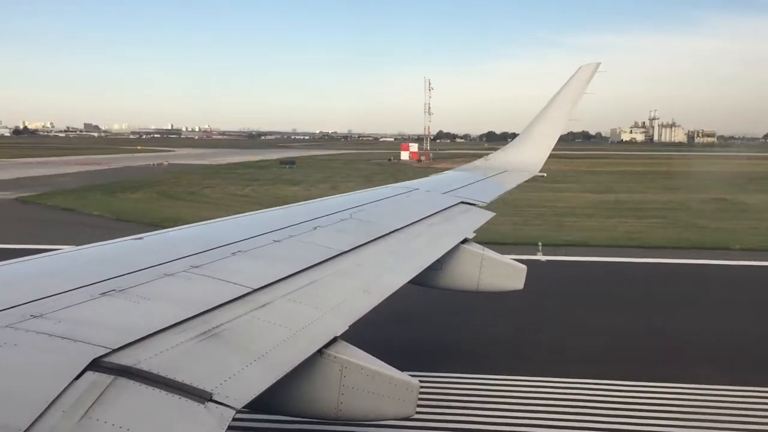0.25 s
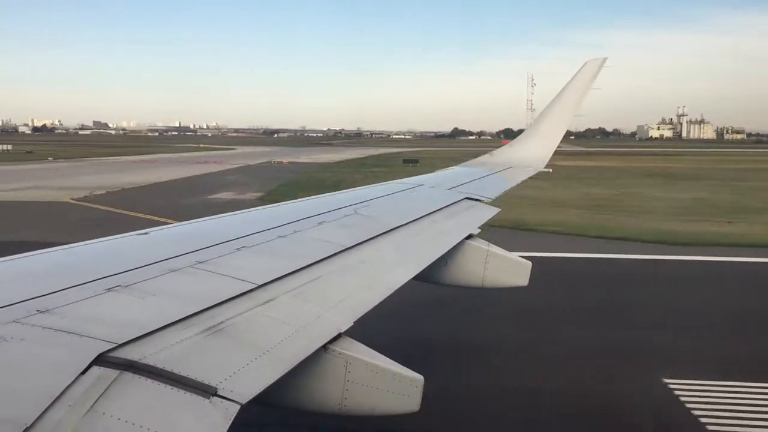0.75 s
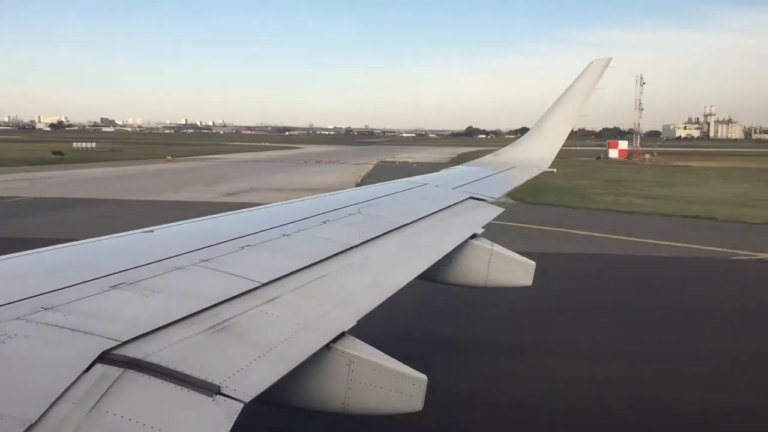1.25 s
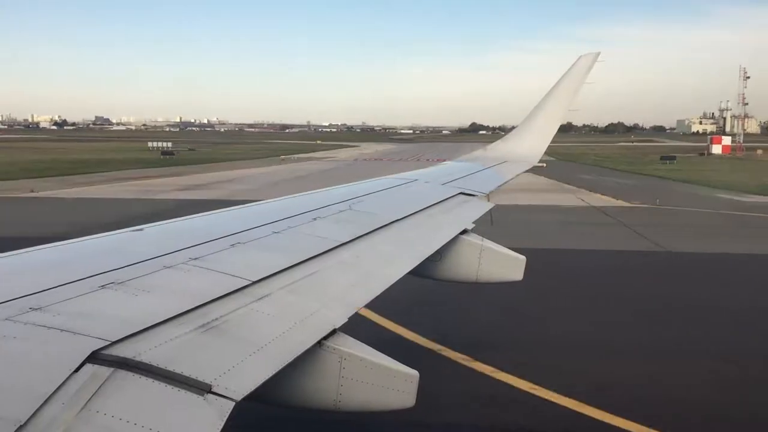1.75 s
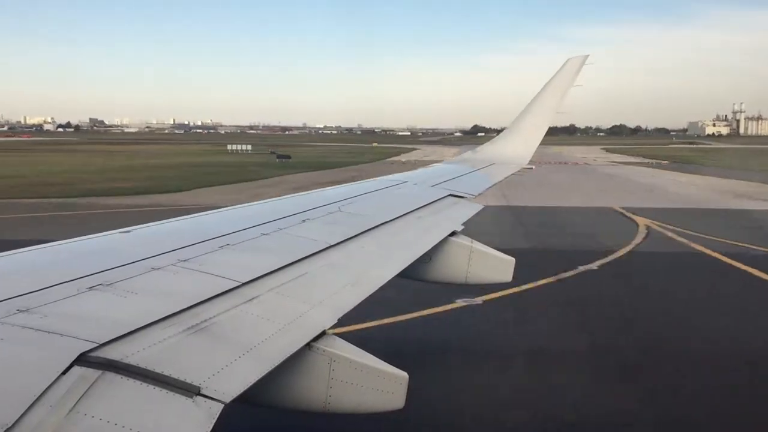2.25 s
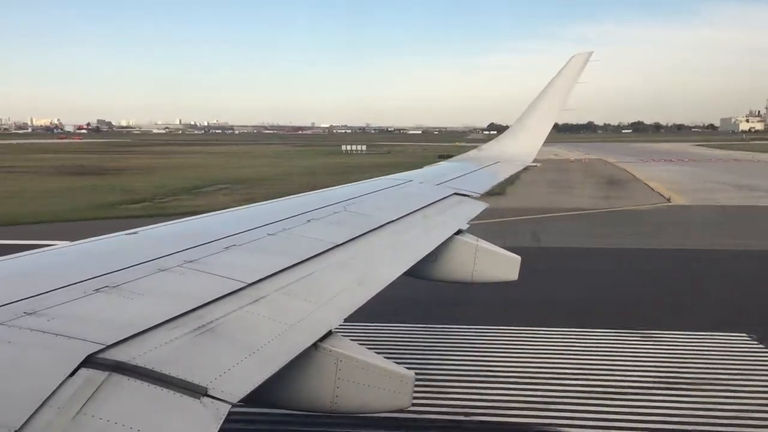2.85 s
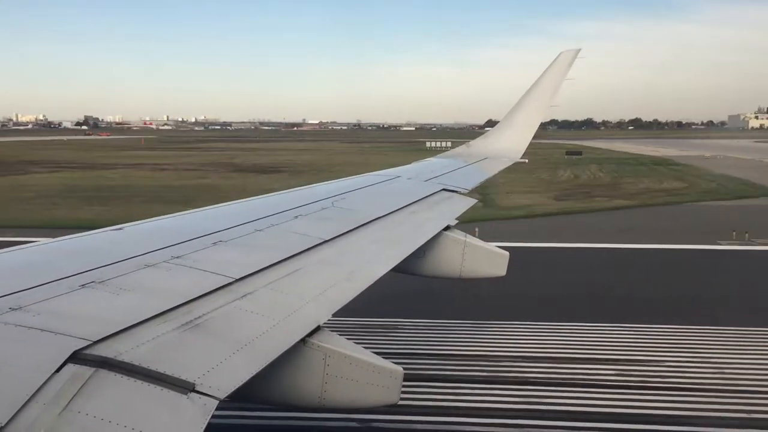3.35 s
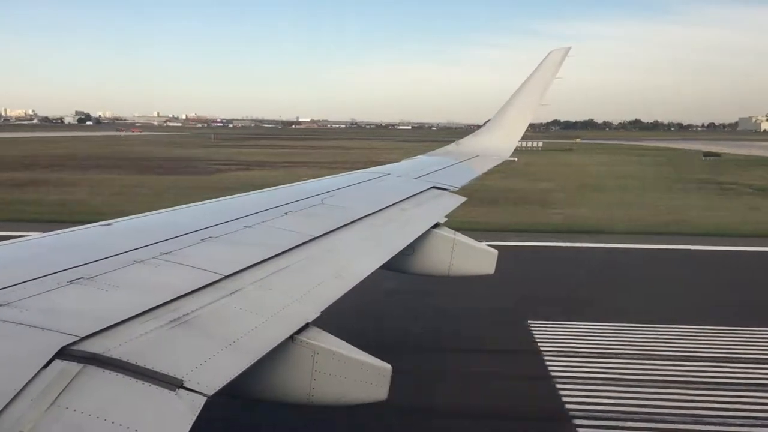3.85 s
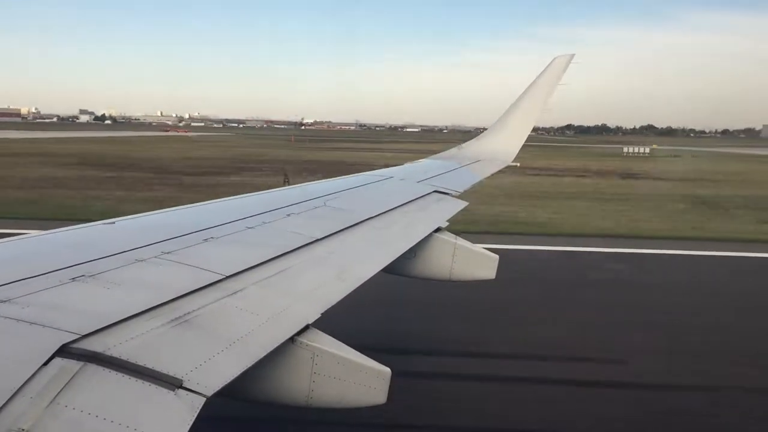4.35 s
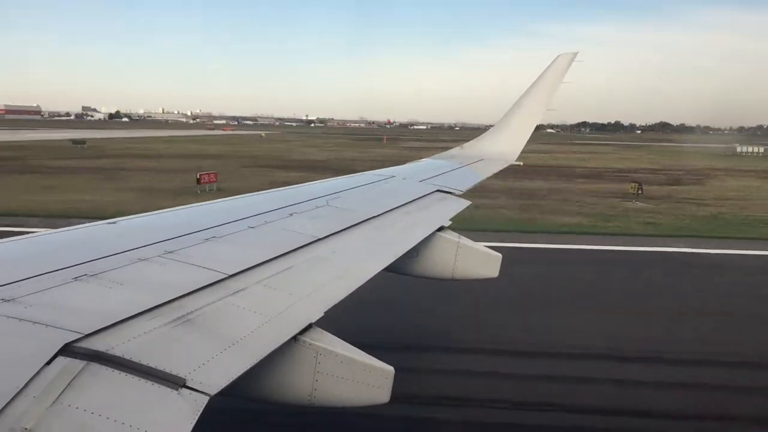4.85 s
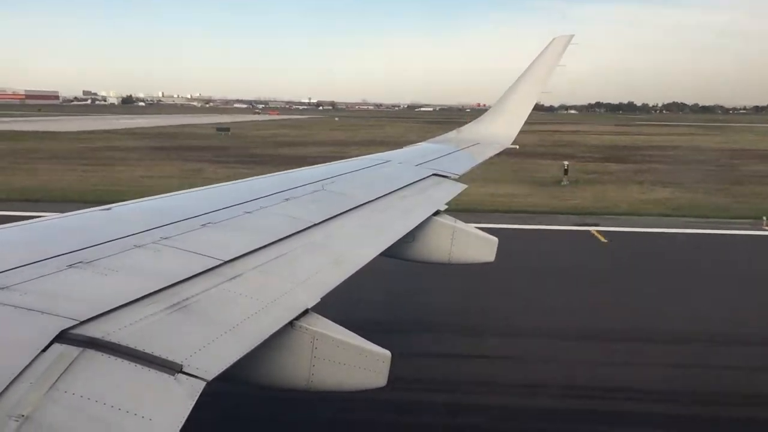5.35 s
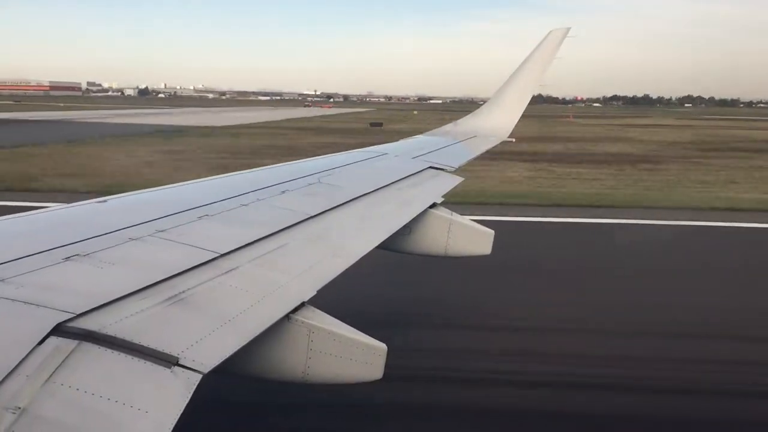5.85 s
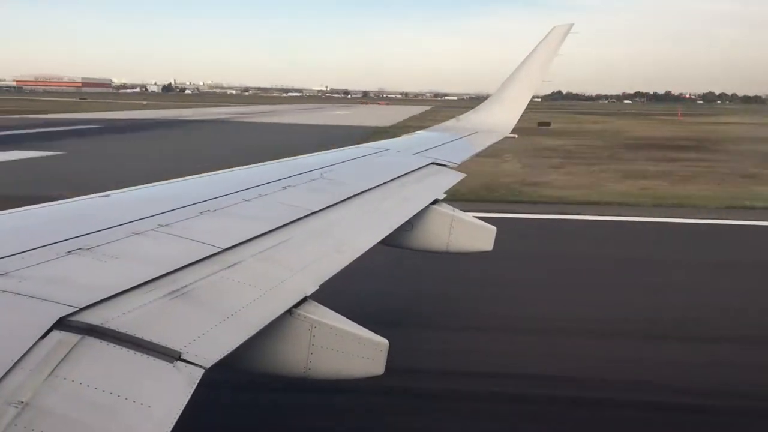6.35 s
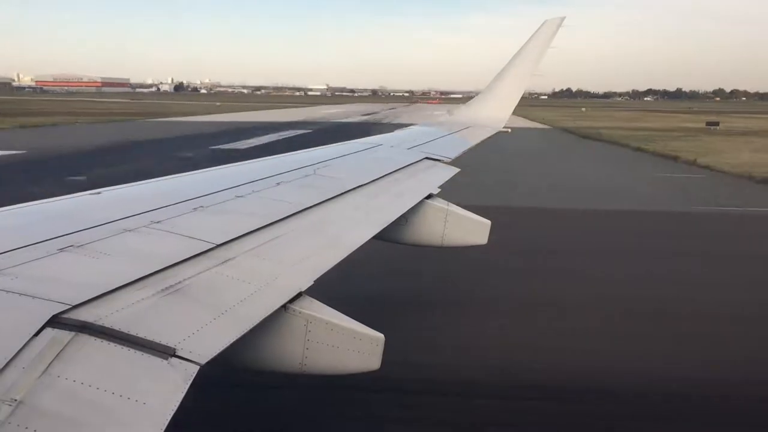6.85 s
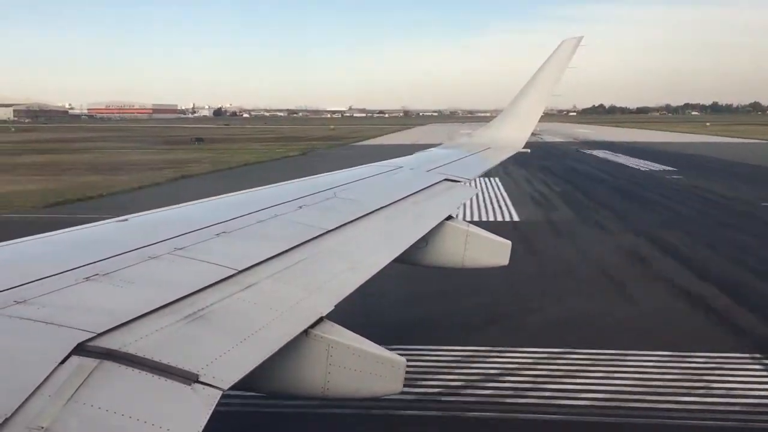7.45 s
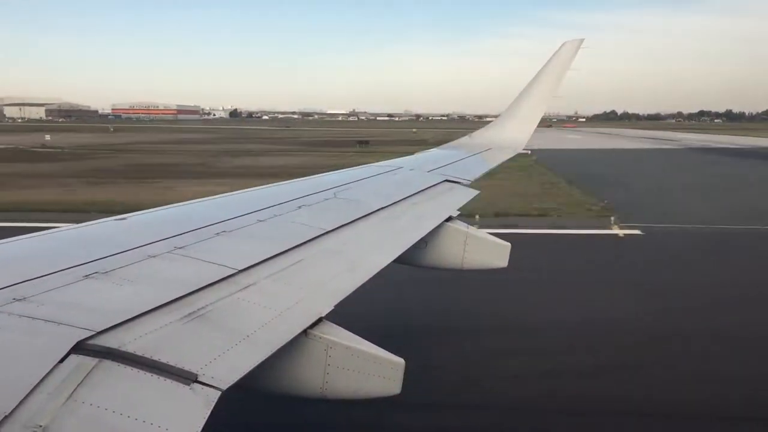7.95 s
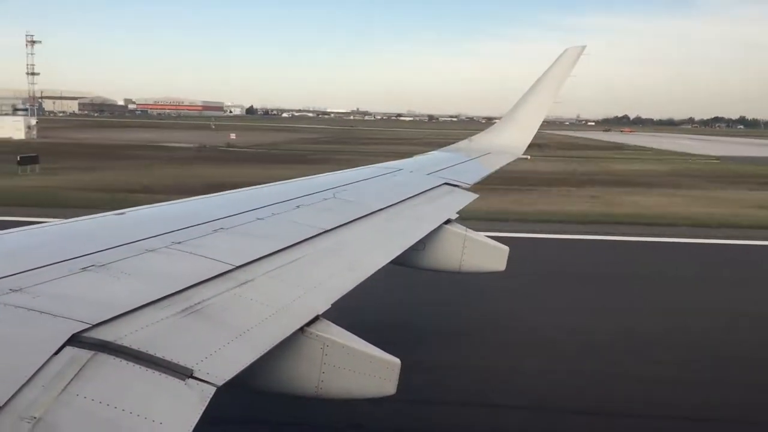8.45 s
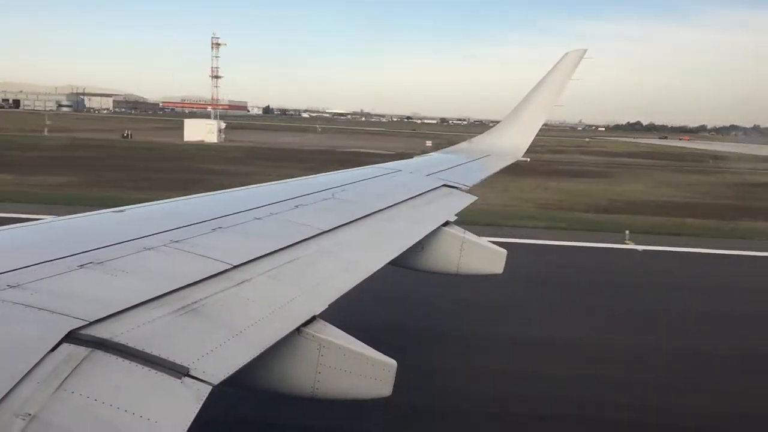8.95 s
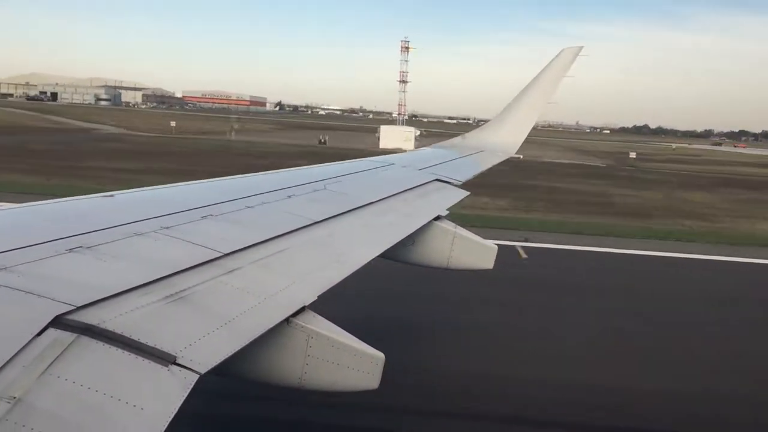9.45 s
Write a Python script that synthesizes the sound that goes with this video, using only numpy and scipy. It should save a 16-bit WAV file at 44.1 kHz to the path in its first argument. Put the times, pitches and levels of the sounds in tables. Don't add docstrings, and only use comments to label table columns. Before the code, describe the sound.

From 0 to about 9.7 seconds, the inside of an airliner cabin on its takeoff roll is filled by a continuous, heavy jet roar: deep rumble through the frame, with a duller, quieter roar from the wall panels. Its level stays nearly steady, slightly fuller around 3.4-4.2 s and slightly lower near 5 and 8 s. A very low boom swells in short irregular pulses throughout, strongest from 8.5 to 9.5 s. Far quieter, an overhead vent hisses with a fluttering, breathy, very high whistle. Faint steady hum and thin machine tones hide behind the noise. Loose trim makes brief dry buzzes and taps, frequent in the first 3.7 s, sharper near 3.4 s, sparser from 4 to 6 s, then busy again around 8.4-9 s. One sharp panel crack snaps at 6.9 s. The roar continues to the end, close and enclosed.

```python
import sys
import numpy as np
from scipy import signal
from scipy.fft import rfft, irfft, next_fast_len
from scipy.io import wavfile

SR = 44100
rng = np.random.default_rng(int(sys.argv[2]) if len(sys.argv) > 2 else 0)


def waveform_to_disk(signal):
    frames = np.transpose(np.atleast_2d(signal))
    scaled = np.clip(frames, -1, 1) * 32767
    samples = np.round(scaled).astype(np.int16)
    wavfile.write(sys.argv[1], SR, samples)


def gain_from_db(level_db):
    decades = np.asarray(level_db, float) / 20
    return 10 ** decades


N = 427769

# t/s, level/dB above the mean
THRUST = [(0, .5), (1, 0.4), (2, 0), (2.6, 0), (3.4, 0.9), (4.2, 0.7), (5, -0.6), (6, 0.3), (7, 0.1),
          (8, -0.6), (9, -0.2), (9.7, 0)]
# f/Hz, level/dB per Hz
RUMBLE_COLOUR = [(15, -51), (25, -19), (41, -17.5), (54, 0), (108, -1.5), (166, -6), (198, -6.5),
                 (231, -12), (283, -18.5), (317, -27.5), (388, -25.5), (430, -13.5), (520, -29.5),
                 (680, -58), (1140, -120)]
# f/Hz, level/dB per Hz
WALL_COLOUR = [(140, -30), (240, 1), (277, -1.5), (328, -9.5), (415, -7.5), (526, -20), (726, -22),
               (1120, -30), (1220, -29), (1490, -35), (2300, -43), (2990, -72), (5060, -120)]
# f/Hz, width/Hz, lift/dB
FUSELAGE_MODES = [(106.8, 9.2, 3.5), (140.4, 8.7, 5), (197, 16, 3.5), (278.4, 9.7, 1.5), (383, 12, 1.5),
                  (439, 14, 0), (238, 8.4, -1.5)]
# f/Hz, width/Hz, lift/dB
PANEL_MODES = [(560, 30, 2.5), (640, 40, 2), (720, 40, 2), (790, 24, -3), (1044, 40, 4.5), (1215, 30, 5),
               (1624, 32, 5.5), (2088, 30, 4.5), (2133, 16, 6)]
# t/s, f/Hz, peak level/dB
BOOM_SWELLS = [(0.31, 58.85, -16.5), (1.04, 64.94, -19.5), (1.2, 65.92, -18), (1.71, 61.02, -22),
               (1.82, 64.0, -16.5), (1.96, 67.18, -18.5), (2.26, 67.8, -16), (2.4, 68.85, -16.5),
               (2.8, 62.93, -19), (3.51, 64.68, -19), (3.67, 64.0, -15.5), (3.84, 64.4, -19.5),
               (4.56, 63.55, -17.5), (5.13, 64.6, -14.5), (5.83, 60.03, -16.2), (6.06, 61.3, -22),
               (6.22, 64.1, -13.5), (6.69, 61.8, -12.5), (7.0, 61.82, -17.0), (7.25, 66.7, -20),
               (7.38, 64.0, -17.5), (7.62, 58.65, -14.5), (7.77, 65.15, -16.5), (7.89, 61.56, -13.5),
               (8.55, 63.37, -12.5), (8.88, 68.57, -11), (9.14, 62.6, -11.5), (9.36, 63.8, -13),
               (9.51, 65.7, -16.8), (9.61, 65.7, -22.5)]
# t/s, whistle f/Hz, whistle level/dB, flow level/dB above the mean
AIR_JET = [(0, 14760, -84, 1), (.45, 14560, -84, 0.9), (1.0, 14530, -85, 0.4), (1.55, 14650, -91.5, 1),
           (1.85, 14500, -79, -2), (2.9, 14480, -83, .6), (3.2, 14400, -82, -1.2), (4.2, 14360, -86, 0.6),
           (4.45, 14370, -90, -0.1), (5.15, 14470, -89, 2), (5.36, 14370, -80.5, -0.2),
           (6.5, 14550, -79, -.2), (7.15, 14500, -84.5, -2.2), (7.3, 14630, -80.5, -1),
           (8.3, 14500, -78.5, 0), (8.6, 14440, -91, 0.8), (8.85, 14440, -84, 0.6),
           (9.7, 14670, -83.5, -0.2)]
# f/Hz, level/dB per Hz
HISS_COLOUR = [(2200, -6.5), (2490, -1.5), (2960, -5.5), (3540, -1.5), (4040, -2), (4600, -7), (5600, -13),
               (6930, -14), (7590, -18.5), (9310, -18.5), (10500, -26), (13500, -26), (14600, -27),
               (15700, -30)]
# f/Hz, width/Hz, lift/dB
DUCT_MODES = [(2250, 20, 3), (2470, 40, 2.5), (2577, 36, 7), (2825, 45, 7.5), (3130, 50, 7),
              (3316, 30, 6.5), (3425, 40, 5.5), (3596, 44, 9), (3665, 40, 3.5), (3780, 30, -3),
              (3885, 50, 4.5), (3980, 50, 4.5), (4065, 20, 4.5), (4124, 50, 5), (4238, 25, 3.5),
              (4346, 22, 5.5), (4870, 40, 3)]
# f/Hz, width/Hz, lift/dB
NOZZLE_MODES = [(6950, 500, 1.5), (7550, 300, -2), (10450, 500, -2.5), (11500, 1200, 1.5),
                (13200, 1200, -2), (15500, 700, -2.5)]
# start t/s, end t/s, first f/Hz, last f/Hz, level/dB
WHISTLE_STRANDS = [
    (-.1, 1.303, 14250, 13970, -83.5),
    (8.65, 9.802, 14020, 14170, -84),
]
# strongest tap t/s, its level/dB, length/s
TRIM_BUZZES = [(0.337, -59.5, 0.033), (0.718, -59.5, 0.02), (0.911, -59.5, 0.031), (1.108, -56.5, 0.021),
               (1.26, -59, 0.031), (1.405, -61.5, 0.046), (1.931, -60.5, 0.022), (1.986, -60, 0.052),
               (2.157, -59, 0.031), (2.514, -56.5, 0.033), (2.726, -59.5, 0.037), (2.992, -59, 0.05),
               (3.105, -58.5, 0.029), (3.431, -53, 0.042), (3.638, -57, 0.052), (3.706, -60.5, 0.032),
               (4.27, -56.5, 0.023), (5.051, -58.5, 0.032), (5.108, -60, 0.022), (6.293, -61.5, 0.028),
               (6.72, -59.5, 0.026), (6.892, -59.5, 0.05), (7.386, -62.5, 0.038), (7.74, -58, 0.021),
               (7.879, -60, 0.023), (8.375, -55, 0.022), (8.629, -62, 0.022), (8.714, -56.5, 0.029),
               (8.798, -56.5, 0.032), (8.925, -60, 0.032)]
# strongest tap t/s, its level/dB
FURTHER_TRIM_BUZZES = [(.166, -65), (.972, -61.5), (1.05, -60.5), (1.149, -58), (1.201, -62), (1.684, -61),
                       (2.269, -61.5), (3.346, -60.5), (4.033, -59), (4.097, -61), (5.52, -60.5), (5.66, -63),
                       (5.758, -62.5), (6.417, -60.5), (7.917, -63), (8.548, -58), (9.008, -59.5), (9.111, -61),
                       (9.326, -64)]
# f/Hz, level/dB per Hz
TAP_COLOUR = [(2500, -9.5), (3500, -3), (4500, -4.5), (5600, -1.5), (6500, -7.5), (7600, -8), (9500, -13.5),
              (10400, -19), (12500, -16), (15500, -20)]
# f/Hz, width/Hz, lift/dB
TRIM_MODES = [(3600, 250, 5), (5800, 300, 2.5), (6950, 350, 6), (8130, 300, 6), (8950, 300, 3),
              (9900, 250, 4), (11000, 500, 4), (11950, 300, 3)]
# t/s, peak level/dB
PANEL_SNAPS = [
    (6.906, -27),
]
# f/Hz, level/dB, t60/s
CRACK_MODES = [(2400, -17, .02), (2900, -15, .02), (3400, -11, .022), (3900, -13, .018), (4400, -18, .014),
               (7300, -27, .008), (9600, -30, .008), (11800, -31, .008), (13800, -30, .008),
               (15300, -34, .008)]
# t/s, level/dB
HUM_LEVEL = [(0, -53), (.35, -53), (.65, -60), (1.1, -55), (2.2, -53.5), (3.3, -57), (3.55, -63),
             (4.1, -57.5), (4.65, -66), (4.95, -54.5), (6.0, -55), (7.1, -57.5), (7.65, -64), (8.3, -57.5),
             (8.75, -63), (9.7, -55.5)]
# f/Hz, level/dB rms, pitch wander/Hz
MACHINE_TONES = [
    (1195.7, -65, .3),
    (2391.4, -75, .4),
    (5060, -80.5, 3.5),
    (6660, -94, .5),
]


def roar():
    rumble_db, wall_db = -16.5, -29
    wall_share = .4
    thrust_db, = in_time(THRUST)
    boom_gap = (64, 22, -1.5)
    rumble = coloured(RUMBLE_COLOUR, [*FUSELAGE_MODES, boom_gap], low_hz=37.8, high_hz=244.0)
    wall = coloured(WALL_COLOUR, [*PANEL_MODES, *FUSELAGE_MODES], low_hz=243.7, high_hz=2120)
    wall_level = gain_from_db(wall_db + wall_share * thrust_db + 0.25 * drift(23))
    return gain_from_db(rumble_db + thrust_db) * rumble + wall_level * wall


def boom():
    rest_db, flicker_db = -30.5, 4
    swell_s, swell_trim_db = 0.04, -2.5
    t = np.arange(N) / SR
    swell_at, swell_hz, peak_db = np.transpose(BOOM_SWELLS)
    level = gain_from_db(rest_db + flicker_db * drift(11.0))
    for at, db in zip(swell_at, peak_db):
        near = slice(max(int((at - .3) * SR), 0), int((at + .3) * SR))
        bell = np.exp(-.5 * ((t[near] - at) / swell_s) ** 2)
        level[near] = np.hypot(level[near], gain_from_db(db + swell_trim_db) * bell)
    pitch_hz = np.interp(t, swell_at, swell_hz) + 2.515 * drift(5.01)
    return np.sqrt(2) * level * np.sin(2 * np.pi * np.cumsum(pitch_hz) / SR)


def vent():
    duct_db, nozzle_db = -58, -66.5
    nozzle_share = .7
    strand_fade = 100
    whistle_hz, whistle_db, flow_db = in_time(AIR_JET)
    duct_level = gain_from_db(duct_db + flow_db + .6 * drift(7.5))
    duct = duct_level * coloured(HISS_COLOUR, DUCT_MODES, low_hz=2100, high_hz=4600)
    nozzle_level = gain_from_db(nozzle_db + nozzle_share * flow_db + .6 * drift(9.0))
    nozzle = coloured(HISS_COLOUR, [*DUCT_MODES, *NOZZLE_MODES], low_hz=4630, high_hz=17000)
    nozzle = patchy(nozzle_level * nozzle, 6000, 14000, count=6, patch_db=1.3, rate=11.0)
    edge = whistle(whistle_hz + 40 * drift(4.0), whistle_db + 1.8 * drift(12.0), width_hz=110)
    out = duct + nozzle + edge
    t = np.arange(N) / SR
    for start, end, first_hz, last_hz, db in WHISTLE_STRANDS:
        outside_s = np.maximum(0, np.maximum(start - t, t - end))
        level_db = np.maximum(db - strand_fade * outside_s + 2.5 * drift(6.0), -140)
        glide_hz = np.interp(t, [start, end], [first_hz, last_hz])
        out = out + whistle(glide_hz, level_db, width_hz=80)
    return out


def whistle(hz, level_db, width_hz):
    low_pass = signal.butter(2, width_hz, fs=SR, output="sos")
    breath = signal.sosfilt(low_pass, rng.standard_normal((2, N)))
    turn = 2 * np.pi * np.cumsum(hz) / SR
    return gain_from_db(level_db) * rms_one(breath[0] * np.sin(turn) + breath[1] * np.cos(turn))


def trim():
    tap_gap_s, further_buzz_s = .0122, .022
    build_db, die_db = 11, 13.5
    taps = []
    for at, peak_db, length_s in [*TRIM_BUZZES, *[(at, db, further_buzz_s) for at, db in FURTHER_TRIM_BUZZES]]:
        for k in range(-4, 5):
            slope_db = build_db if k < 0 else die_db
            taps.append((at + k * tap_gap_s, peak_db - slope_db * abs(k) * tap_gap_s / length_s))
    idle_at = np.arange(0, N / SR - .05, tap_gap_s)
    idle_db = -70.5 + 3.0 * np.clip(drift(6)[(idle_at * SR).astype(int)], -3, 1.3)
    tap_at, tap_db = np.concatenate([np.transpose(taps), [idle_at, idle_db]], axis=1)
    chance = rng.standard_normal((len(tap_at), 2))
    place = ((tap_at + 0.00056 * chance[:, 0]) * SR).astype(int)
    clicks = np.zeros(N)
    np.add.at(clicks, np.clip(place, 0, N - 1), gain_from_db(tap_db + 1.5 * chance[:, 1]))
    scuff = signal.lfilter([1], [1, -gain_from_db(-60 / (0.028 * SR))], clicks + 1e-18)
    scuff = signal.lfilter([.06], [1, -.94], scuff)
    grit = coloured(TAP_COLOUR, TRIM_MODES, low_hz=2600, high_hz=17000)
    grit = patchy(grit, 4000, 13000, count=8, patch_db=1.6, rate=20.0)
    return gain_from_db(3.5) * scuff * grit


def snap():
    damping = .5
    clicks = np.zeros(N)
    for at, peak_db in PANEL_SNAPS:
        clicks[round(at * SR)] = gain_from_db(peak_db)
    out = np.zeros(N)
    for k, (hz, level_db, t60) in enumerate(CRACK_MODES):
        out = out + (-1) ** k * gain_from_db(level_db) * ring(clicks, hz, damping * t60)
    return out


def ring(clicks, hz, t60):
    r, w = gain_from_db(-60 / (t60 * SR)), 2 * np.pi * hz / SR
    return signal.lfilter([0, np.sin(w)], [1, -2 * r * np.cos(w), r * r], clicks + 1e-18)


def tones():
    hum_hz = 808.6
    hum_db, = in_time(HUM_LEVEL)
    out = np.sqrt(2) * gain_from_db(hum_db + 1.5) * np.sin(2 * np.pi * hum_hz * np.arange(N) / SR)
    for hz, level_db, wander_hz in MACHINE_TONES:
        turn = 2 * np.pi * np.cumsum(hz + wander_hz * drift(3.0)) / SR
        out = out + np.sqrt(2) * gain_from_db(level_db + 1.2 * drift(1.3)) * np.sin(turn)
    return out


def coloured(spectrum, resonances, low_hz, high_hz):
    size = next_fast_len(N)
    hz = np.maximum(np.arange(size // 2 + 1) * SR / size, 1)
    curve_hz, curve_db = np.transpose(spectrum)
    level_db = np.interp(np.log(hz), np.log(curve_hz), curve_db)
    for centre_hz, width_hz, lift_db in resonances:
        level_db = level_db + lift_db / (1 + (2 * (hz - centre_hz) / width_hz) ** 4)
    edges = 1 / np.sqrt((1 + (low_hz / hz) ** 16) * (1 + (hz / high_hz) ** 16))
    white = rfft(rng.standard_normal(size))
    return rms_one(irfft(white * gain_from_db(level_db) * edges, size)[:N])


def patchy(x, low_hz, high_hz, count, patch_db, rate):
    size = next_fast_len(N)
    spectrum, hz = rfft(x, size), np.arange(size // 2 + 1) * SR / size
    band = np.digitize(hz, np.geomspace(low_hz, high_hz, count - 1))
    out = np.zeros(N)
    for k in range(count):
        out = out + gain_from_db(patch_db * drift(rate)) * irfft(spectrum * (band == k), size)[:N]
    return out


def drift(rate):
    r = np.exp(-2 * np.pi * rate * 40 / SR)
    noise = rng.standard_normal(N // 40 + 4002)
    slow = signal.lfilter([1], [1, -2 * r, r * r], noise)[4000:]
    return np.interp(np.arange(N) / 40, np.arange(len(slow)), rms_one(slow))


def in_time(rows):
    at, *columns = np.transpose(rows)
    return [np.interp(np.arange(N) / SR, at, column) for column in columns]


def rms_one(x):
    return x / np.sqrt(np.mean(x ** 2) + 1e-20)


def scene():
    mix = roar() + boom() + vent() + trim() + snap() + tones()
    return mix[None]


def band_limit(x):
    return signal.sosfilt(signal.butter(12, 15760, fs=SR, output="sos"), x)


def record(dry):
    finished = 1.087 * np.tanh(dry / 1.112)
    return band_limit(finished)


dry = scene()
out = record(dry)
waveform_to_disk(out)
```